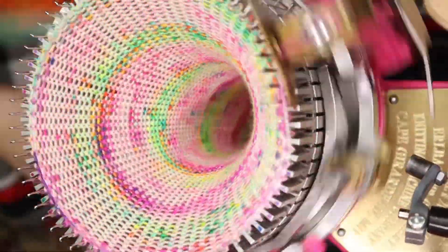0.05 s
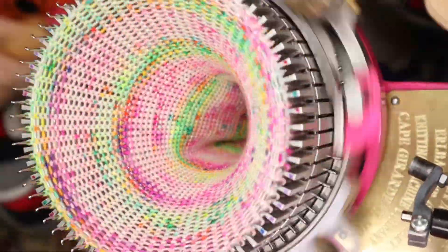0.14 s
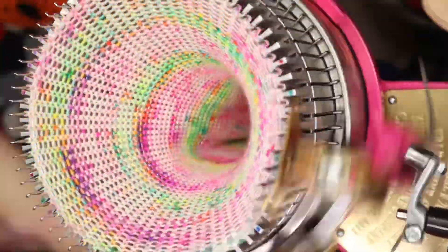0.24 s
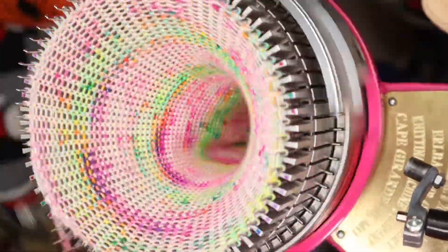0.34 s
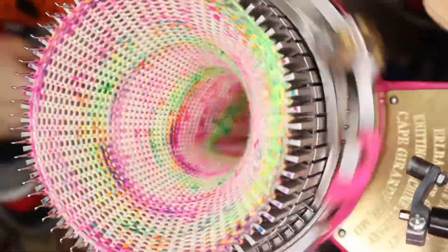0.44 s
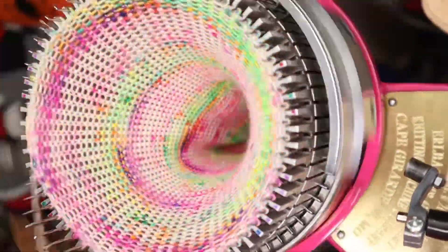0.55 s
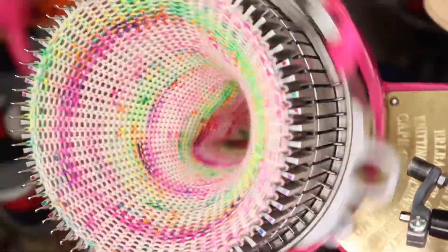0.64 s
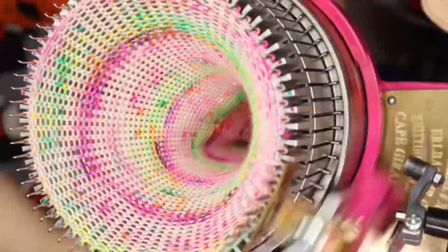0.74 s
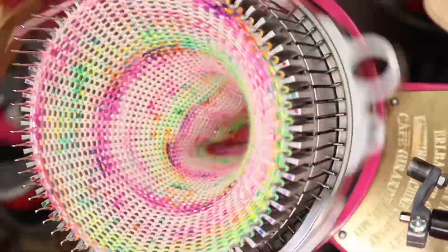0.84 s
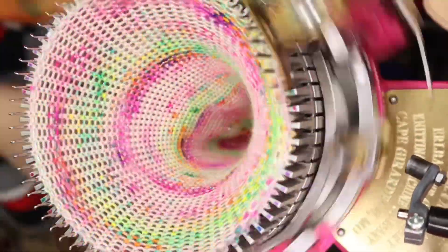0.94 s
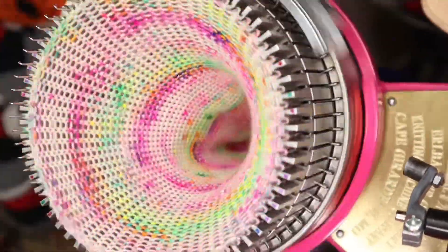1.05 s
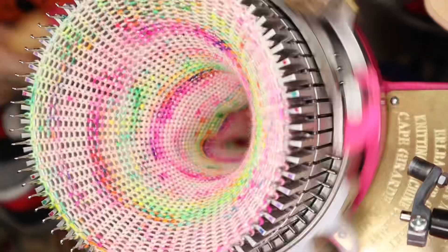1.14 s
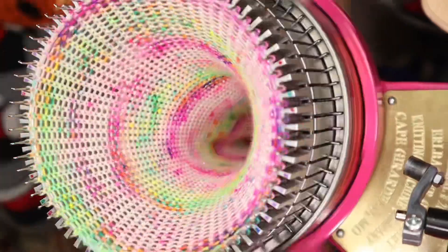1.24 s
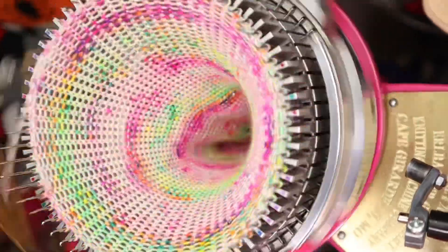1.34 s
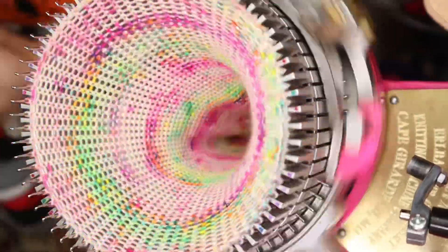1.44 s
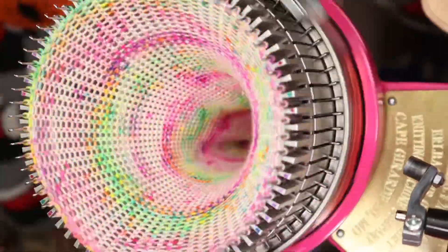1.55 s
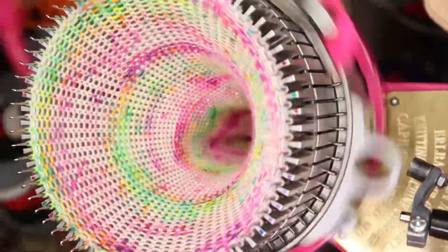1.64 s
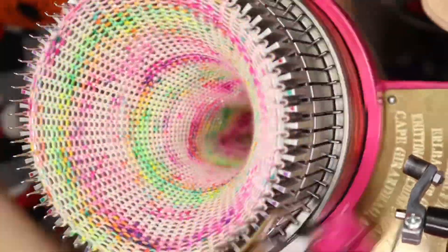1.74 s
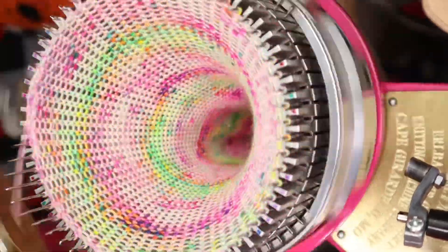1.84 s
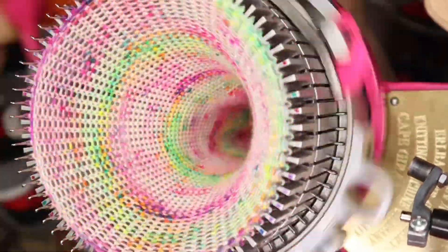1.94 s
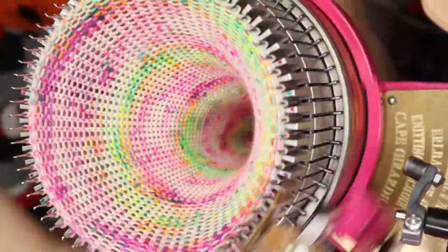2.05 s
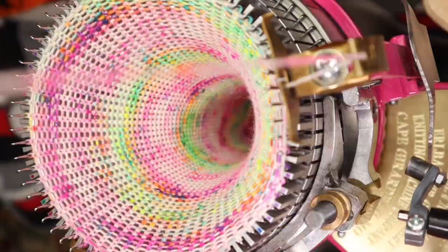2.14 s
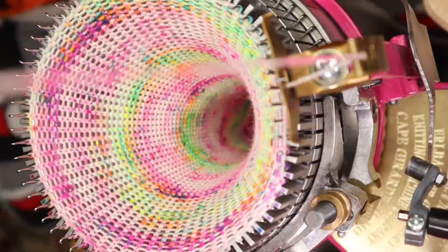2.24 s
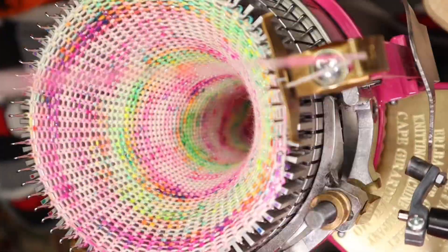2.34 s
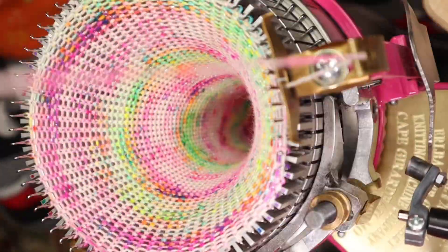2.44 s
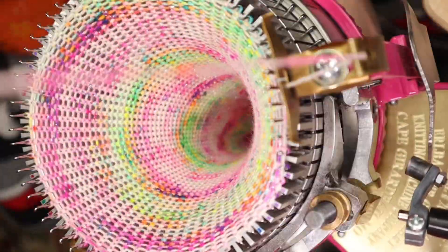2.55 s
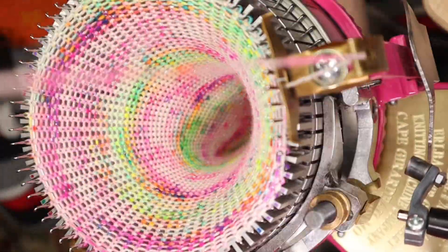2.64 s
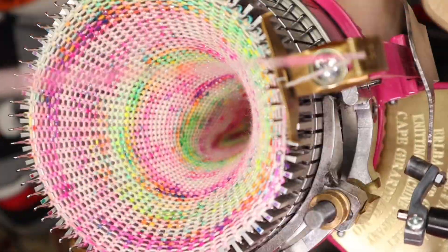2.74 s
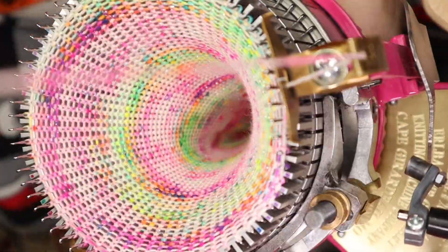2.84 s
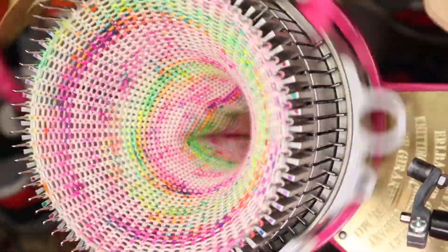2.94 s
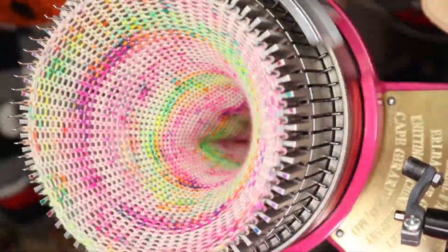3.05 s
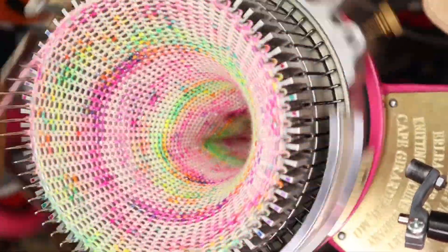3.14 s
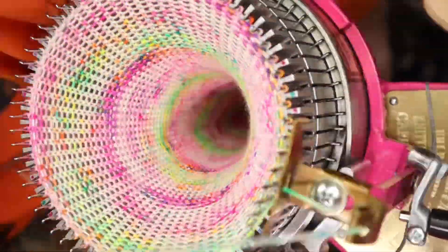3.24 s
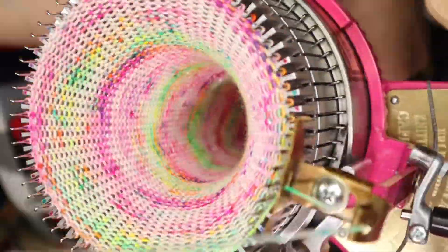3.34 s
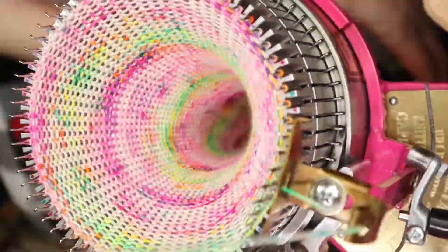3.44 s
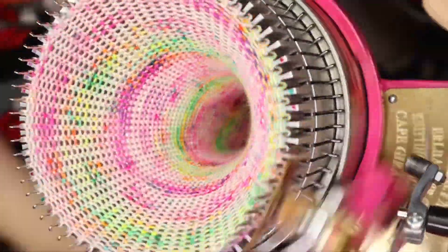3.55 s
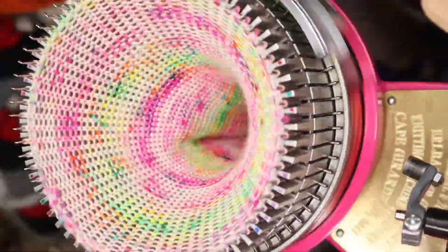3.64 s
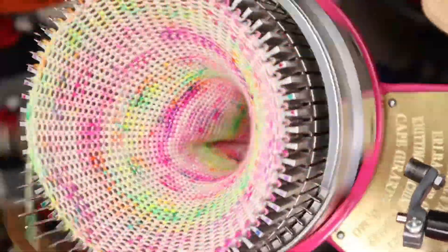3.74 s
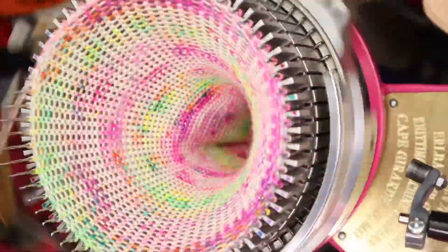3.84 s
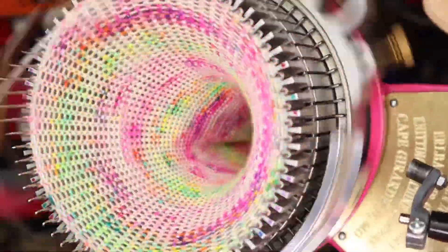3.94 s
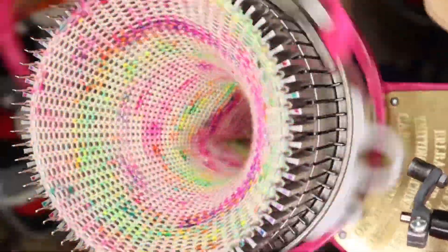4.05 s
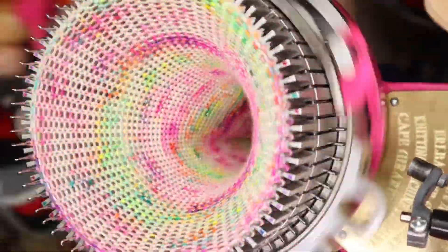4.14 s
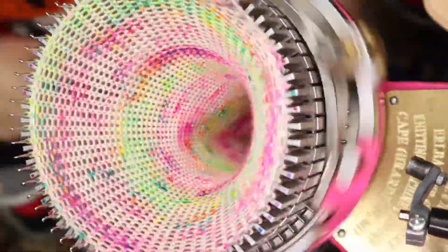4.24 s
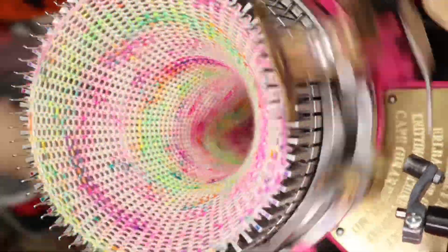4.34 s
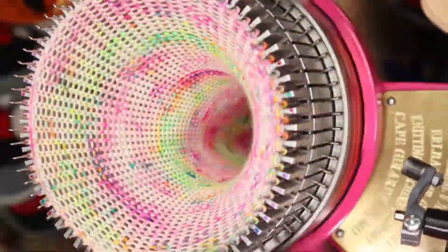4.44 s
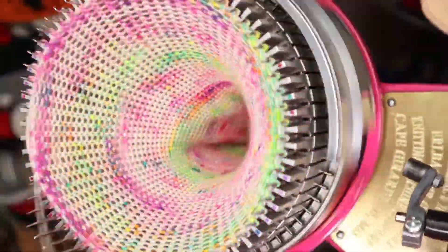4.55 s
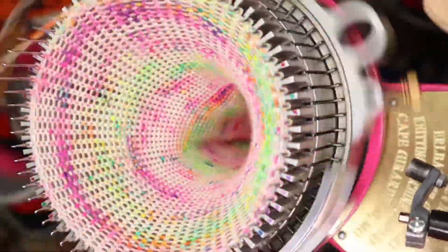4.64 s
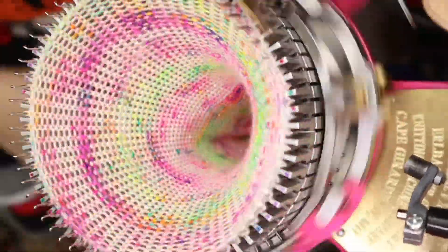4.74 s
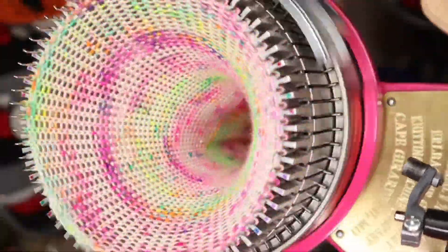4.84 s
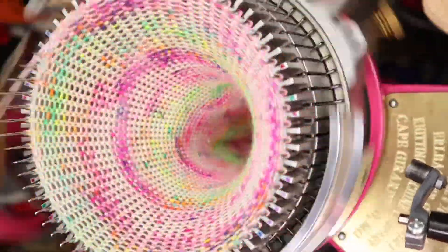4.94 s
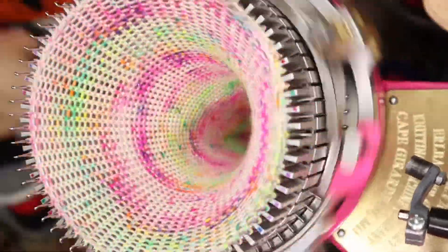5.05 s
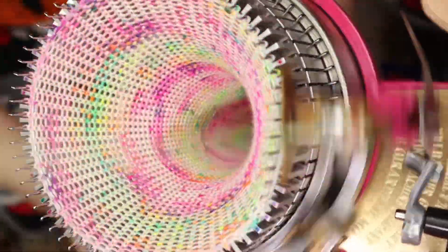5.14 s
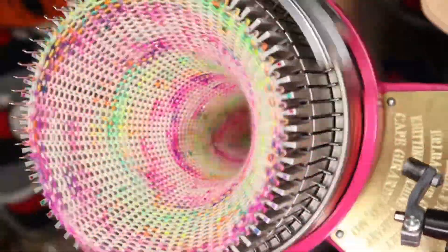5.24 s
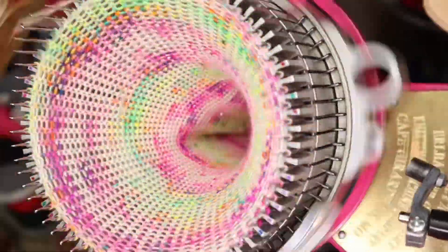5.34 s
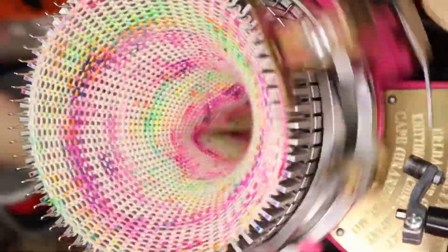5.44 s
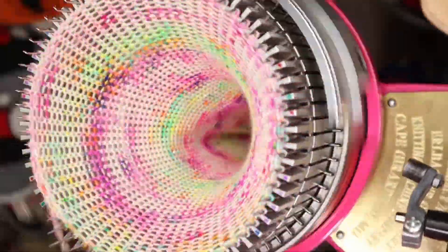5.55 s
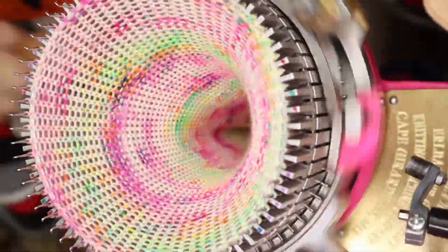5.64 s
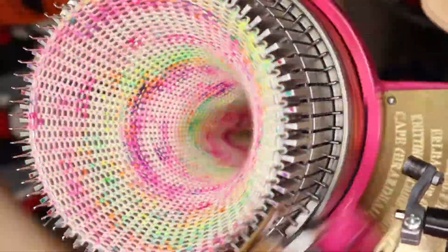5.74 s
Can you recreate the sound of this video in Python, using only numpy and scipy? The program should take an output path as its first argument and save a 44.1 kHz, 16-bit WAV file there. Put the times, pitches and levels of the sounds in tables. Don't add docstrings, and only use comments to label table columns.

```python
import sys
import numpy as np
from scipy import signal
from scipy.fft import rfft, irfft, next_fast_len
from scipy.io import wavfile
from scipy.ndimage import uniform_filter1d

SR = 44100
rng = np.random.default_rng(int(sys.argv[2]) if len(sys.argv) > 2 else 0)


def nominal_scale(level):
    x = np.asarray(level, float) / 20
    return 10 ** x


def store_pcm(level_fs):
    pcm = np.round(np.clip(level_fs, -1, 1) * 32767).astype(np.int16)
    wavfile.write(sys.argv[1], SR, np.atleast_2d(pcm).T)


N = 255151
NEEDLES = 72
EDGE_HZ = 15790

# [t/s, trip level/dB, spring-back level/dB]
TURNS = [(0.0444, -33, -35), (0.178, -22, -26.5), (0.3031, -24, -25.5), (0.4356, -39, -42),
         (0.5753, -35, -34), (0.7232, -27, -35), (0.862, -16.5, -27), (0.9949, -21, -28),
         (1.1341, -23.5, -36), (1.267, -22, -30), (1.4034, -19, -31), (1.5395, -22, -29),
         (1.675, -27, -27.5), (1.8041, -42, -31), (1.934, -20.5, -33), (2.0669, -40, -47),
         (2.1964, -38, -37), (2.3301, -32, -32), (2.4801, -40, -52), (4.0158, -50, -38),
         (4.2142, -25, -31.5), (4.43, -20.5, -28), (4.6048, -24.5, -29), (4.7702, -25, -29.5),
         (4.9412, -24, -33), (5.0999, -24, -26.5), (5.2691, -24, -28), (5.434, -20, -29.5),
         (5.5946, -21, -26.5), (5.7536, -23.5, -27)]


def evened(x):
    return x / np.sqrt(np.mean(x ** 2) + 1e-20)


def peaked(x):
    return x / abs(x).max()


def read(points, hz):
    f, value = np.transpose(points)
    return np.interp(np.log(hz + 1), np.log(f + 1), value)


def add(mix, s, sound):
    part = mix[..., round(s * SR):][..., :sound.shape[-1]]
    part += sound[..., :part.shape[-1]]


def ring(x, modes):
    out = np.zeros(x.shape)
    for k, (hz, width, db) in enumerate(modes):
        r = np.exp(-np.pi * width / SR)
        pole = r * np.exp(2j * np.pi * hz / SR)
        resonance = signal.lfilter([1 - r], [1, -pole], x).real
        out += (-1) ** k * nominal_scale(db) * 2 * resonance
    return out


def coloured(x, points):
    size = next_fast_len(N)
    response = nominal_scale(read(points, np.fft.rfftfreq(size, 1 / SR)))
    return irfft(rfft(x, size) * response, size)[..., :N]


def load(lobes, turns):
    grid = np.arange(256) / 256
    lift_db = 0
    for at, width, db in lobes:
        distance = (grid - at + .5) % 1 - .5
        lift_db = lift_db + db * np.exp(-.5 * (distance / width) ** 2)
    return lift_db[(turns % 1 * 256).astype(int)]


def moving():
    t = np.arange(N) / SR
    stop_s, brake_db_per_s, start_s, pick_up_db_per_s = 2.457, 1298, 4.045, 400
    braking_db = (stop_s - t) * brake_db_per_s
    starting_db = (t - start_s) * pick_up_db_per_s
    return np.clip(np.maximum(braking_db, starting_db), -70, 0)


def angle():
    pull, fastest_turn = .17, .34
    s = np.array([row[0] for row in TURNS])
    s = np.concatenate([[2 * s[0] - s[1]], s, [2 * s[-1] - s[-2]]])
    turns = np.interp(np.arange(N) / SR, s, np.arange(len(s)))
    swing = 1 + np.sin(2 * np.pi * (turns - fastest_turn))
    return turns, turns + pull / (2 * np.pi) * swing


def strikes(turns, offset, decay_s, uneven_db, late):
    needle = np.floor(NEEDLES * turns + offset).astype(int)
    size, lag = rng.standard_normal((needle.max() + 1, 2)).T
    at = np.flatnonzero(np.diff(needle) > 0)
    struck = needle[at]
    hits = np.zeros(N)
    hits[np.clip(at + (late * SR * lag[struck]).astype(int), 0, N - 1)] = nominal_scale(uneven_db * size[struck])
    rattle = signal.lfilter([1], [1, -np.exp(-1 / (decay_s * SR))], hits)
    return evened(hits), evened(rattle)


def machine():
    # [t/s, level/dB]
    crank = [(0, 1), (.8, 0.5), (1.6, 0.35), (2, 1.5), (2.45, 0.5), (4.03, -5.5), (4.1, -3.5), (4.2, -1.5),
             (4.3, -4), (4.45, -2.5), (4.7, -1.5), (5.1, -1), (5.8, -1)]
    # [f/Hz, bandwidth/Hz, level/dB, lateness of its loud side/turns]
    frame = [(326, 21, -34, 0.31), (507, 20.7, -13.5, 0.026), (620, 44, -26, -0.23),
             (786, 80, -25.5, -0.085), (1150, 62, -14.5, -0.014), (1348, 45, -17, 0.12)]
    cylinder = [(2090, 170, -14, .03), (2280, 147, -6, 0.035), (2490, 120, -8, 0.022),
                (2633, 173, -6, -0.035), (2996, 270, -8.5, -0.017), (3294, 330, -16, -.4)]
    needle = [(5040, 330, -1, -0.0094), (5260, 480, -3, 0.0063)]
    hook = [(3740, 1090, -13.5, -0.078), (4423, 950, -9, -0.084), (5723, 260, -3.5, -0.0031),
            (6243, 270, -4.5, 0.0085), (6700, 590, -9.5, .015)]
    latch = [(7640, 270, -13, -0.0076), (9440, 390, -12.5, -0.03), (10370, 610, -7, -0.0095),
             (11370, 660, -9, .03), (12600, 250, -8.5, .06)]
    yarn_guide = [(8050, 2200, -19.5, 0.048), (13100, 620, -30, 0.02), (14950, 960, -14.5, 0.024)]
    # [position/turns, width/turns, lift level/dB]
    frame_load = [(0.45, .2, 10), (0.04, 0.069, 8.5)]
    cylinder_load = [(0.498, 0.08, 9.55), (.65, 0.054, 11.2), (0.841, 0.069, 14)]
    needle_load = [(0.66, 0.18, 3.8), (0.829, 0.057, 13.4), (.02, 0.033, 9.4)]
    hook_load = [(0.39, 0.12, 7.7), (0.885, 0.13, 10.1), (0.015, 0.041, 4.7)]
    latch_load = [(0.41, 0.071, 3.9), (0.844, 0.081, 11.8), (0.032, 0.052, 9.8)]
    guide_load = [(0.46, 0.12, 3.8), (0.95, 0.039, 1.56), (0.013, 0.019, 5.7)]
    # modes, loads, unloaded dB, share of effort followed, friction, share of like knocks, bunching dB
    parts = [(frame, frame_load, -12, .3, 1.5, .3, 2.2),
             (cylinder, cylinder_load, -12, 1.1, .4, 2.2, 1.3),
             (needle, needle_load, -11, 1.1, .55, .7, 1.9),
             (hook, hook_load, -9.5, 1.1, .55, .7, 1.6),
             (latch, latch_load, -9, .9, .6, 0, 1.8),
             (yarn_guide, guide_load, -2.5, .7, .9, 0, 1.2)]
    full_db, clump_s = -30.5, .018
    t = np.arange(N) / SR
    turns, carriage = angle()
    effort_db = np.interp(t, *np.transpose(crank))
    moving_db = moving()
    out = np.zeros((2, N))
    for k, (modes, lobes, rest_db, follow, slide, alike, bunch_db) in enumerate(parts):
        knocks, rattle = strikes(carriage, offset=k / 6, decay_s=.0006, uneven_db=3.0, late=.00003)
        for hz, width, db, late in modes:
            clump_db = bunch_db * np.interp(t / clump_s, np.arange(1000), rng.standard_normal(1000))
            round_db = rest_db + load(lobes, turns - late) + clump_db
            paths = 1 + (hz > 6000)
            friction = slide * nominal_scale(-.5 * round_db)
            noise = (rattle + friction) * rng.standard_normal((paths, N), np.float32)
            level = nominal_scale(full_db + follow * effort_db + moving_db + round_db)
            rung = ring(level * (noise + alike * knocks), [(hz, width, db)])
            if 1900 < hz < 7000:
                rung = ring(rung, [(hz, width, 0)])
            out[:paths] += rung
    return out


def counter():
    # [f/Hz, bandwidth/Hz, level/dB]
    counter_modes = [(3640, 1760, -16), (5100, 300, 2), (6170, 890, -6), (11060, 1760, -11),
                     (13950, 1420, -7)]
    out, t = np.zeros(N), np.arange(1500) / SR
    gaps = np.minimum(np.diff([row[0] for row in TURNS], prepend=-.09), .175)
    for (s, trip_db, back_db), gap in zip(TURNS, gaps):
        a, b, c = rng.standard_normal((3, len(t)))
        lever = peaked(ring(nominal_scale(-60 * t / 0.027) * a * np.minimum(t / 0.0026, 1), counter_modes))
        snap = peaked(ring(nominal_scale(-60 * t / 0.0066) * b, [(14600, 2300, 0)]))
        spring = peaked(ring(nominal_scale(-60 * t / 0.043) * c * np.minimum(t / 0.0031, 1), counter_modes))
        add(out, s, nominal_scale(trip_db - 6.5) * (lever + .5 * snap))
        add(out, s + 0.11 * gap - .01, nominal_scale(back_db) * spring)
    return out


def gear():
    # [multiple, level/dB]
    harmonics = [(1, -62.5), (2, -63)]
    # [position/turns, width/turns, lift level/dB]
    gear_load = [(.42, 0.2, 12.7)]
    # [f/Hz, bandwidth/Hz, level/dB]
    gear_box = [(528, 70, 0.5), (635, 87, 1), (1146, 150, -1.5)]
    turns, carriage = angle()
    uneven_db = 4 * np.interp(2 * turns, np.arange(80), rng.standard_normal(80))
    slack = 0.82 * evened(uniform_filter1d(rng.standard_normal(N), size=900))
    phase = 2 * np.pi * NEEDLES * carriage + slack
    tone = sum(nominal_scale(db) * np.sin(k * phase) for k, db in harmonics)
    housed = ring(ring(tone, gear_box), gear_box)
    return housed * nominal_scale(load(gear_load, turns) - 12 + uneven_db + moving())


def glides(rows):
    out = np.zeros(N)
    for s, length, from_hz, glide, db in rows:
        hz = from_hz * np.geomspace(1, glide, round(length * SR))
        tremble = evened(uniform_filter1d(rng.standard_normal(SR // 4), 400))[:len(hz)]
        hz = hz * (1 + 0.019 * tremble)
        tone = np.sin(2 * np.pi * np.cumsum(hz) / SR)
        add(out, s, nominal_scale(db) * tone * np.hanning(len(hz)) ** 0.2)
    return out


def whines():
    # [t/s, duration/s, f/Hz, level/dB]
    held = [
        (.2, 0.054, 502, -79),
        (.75, 0.083, 498, -61.5),
        (1.2, .16, 1150, -59),
        (4.64, .1, 497, -56.5),
        (4.76, .044, 1157, -67),
        (4.96, 0.116, 494, -60),
        (5.41, 0.13, 499, -61),
        (5.62, .11, 499.7, -56.5),
    ]
    return glides([(s, length, hz, 1, db) for s, length, hz, db in held])


def squeaks():
    # [t/s, initial f/Hz, glide ratio, level/dB]
    pulls = [(.19, 600, 1.04, -60), (1.69, 600, 1.06, -65), (1.83, 620, 1.07, -59), (2.09, 620, 1.05, -66),
             (4.02, 476, 1.2, -59), (4.1, 874, 1, -63), (4.45, 730, 1.03, -60.5), (4.79, 720, 1.14, -58.5),
             (5.12, 735, 1.05, -61), (5.29, 745, 1.2, -60), (5.34, 667, 0.86, -53)]
    return glides([(s, 0.053, *rest) for s, *rest in pulls])


def scrapes():
    # [t/s, duration/s, level/dB]
    drags = [
        (2.887, 0.033, -47.5),
        (3.649, 0.0265, -38),
    ]
    out = np.zeros(N)
    for s, length, db in drags:
        n = round(length * SR)
        swell = np.linspace(.4, 1, n) * signal.windows.tukey(n, .3)
        grain = evened(uniform_filter1d(rng.standard_normal(SR // 10), size=40))
        grit = rng.standard_normal(SR // 10) * nominal_scale(4.1 * grain)
        add(out, s, nominal_scale(db) * swell * grit[:n])
    return ring(out, [(3660, 780, -1.5), (5200, 900, 0.55), (6500, 700, -1)])


def taps():
    # [t/s, peak level/dB, f/Hz, bright tick level/dB, left-right level/dB]
    clinks = [(2.474, -35, 5240, -13, -4), (2.4806, -27, 10900, -8.5, -8), (2.482, -33, 7500, -2, -6),
               (2.809, -45, 5800, -21, 8), (2.861, -37.5, 4800, -15, 0), (2.902, -43, 5100, -21, -2.5),
              (2.913, -45, 6700, -23, -1), (2.9718, -34, 3800, 6, -4), (2.972, -22, 5840, -13, -7),
              (2.981, -32, 3650, -2.5, -3), (3.596, -37, 4860, -3.5, .4), (3.655, -40, 4320, -19, -6),
              (3.661, -38, 5100, -4, 6), (3.665, -38, 6700, -25, -12), (3.6683, -31, 5100, -18, -5),
              (4.0045, -44, 9050, 0, -4.5), (4.017, -31.5, 13800, -3, -7), (4.0217, -29.5, 5400, -16, -2),
              (4.028, -36, 5960, 0, 4), (4.033, -43, 4300, -5, 0), (4.0352, -29.5, 6300, -6, 0)]
    # [t/s, peak level/dB, f/Hz, bright tick level/dB]
    dull_taps = [(2.509, -44.5, 1160, -20), (2.519, -48, 1200, -20), (2.638, -54, 1150, -12),
                 (2.675, -60, 1230, -25), (2.775, -52, 1990, -19), (2.9715, -45.5, 670, -34),
                 (2.973, -43.5, 1300, -30), (2.982, -44, 1150, -35), (3.028, -32, 1390, -32),
                 (3.0598, -50, 1120, -18), (3.064, -45, 1780, -12), (3.184, -56, 1790, -17),
                 (3.226, -54, 1790, -16), (3.493, -54, 1760, 4), (3.975, -50, 2960, -11)]
    # [t/s, peak level/dB, f/Hz]
    ticks = [
        (2.733, -49, 9300),
        (3.0268, -41, 2900),
        (3.0508, -50, 2700),
        (3.0597, -36, 2680),
        (3.699, -50, 9300),
        (3.794, -44, 9900),
        (3.86, -45, 9800),
    ]
    clink_t60_s, tick_t60_s, tap_cycles = .017, .007, 45
    rows = [(*row, clink_t60_s) for row in clinks]
    rows += [(*row, 0, tap_cycles / row[2]) for row in dull_taps]
    rows += [(s, db, hz, -7, 1.5, tick_t60_s) for s, db, hz in ticks]
    out, t = np.zeros((2, N)), np.arange(3000) / SR
    for s, peak_db, hz, tick_db, pan_db, t60 in rows:
        a, b = rng.standard_normal((2, len(t)))
        fall = nominal_scale(-60 * t / t60)
        modes = [(hz, 3.44 / t60, 0), (1.55 * hz, 0.2 * hz, -14),
                 (2.22 * hz, 0.32 * hz, -17), (0.747 * hz, 0.14 * hz, -16)]
        body = peaked(ring((a + 5.8) * fall ** 6.1, modes))
        crack = peaked(ring(b * fall ** 0.66, [(3650, 1200, 3), (6400, 2900, -1),
                                               (9200, 1600, 2.5), (13100, 3500, -1.0)]))
        sides = nominal_scale(peak_db + np.array([[.5], [-.5]]) * pan_db)
        add(out, s, sides * (body + nominal_scale(tick_db) * crack))
    return out


def ports(shared, apart):
    # [f/Hz, left-right correlation]
    same = [(1000, 1), (4000, 1), (7000, 0.96), (10000, 1), (12500, 0.19), (16000, 0.17)]
    # [f/Hz, left-right level/dB]
    lean_db = [(300, 1.5), (700, 0.9), (2600, -1.3), (4400, -3), (8100, -3.5), (15000, -3)]
    size = next_fast_len(N)
    hz = np.fft.rfftfreq(size, 1 / SR)
    spread = np.arccos(np.clip(read(same, hz), 0, 1)) / 2
    lean = nominal_scale(np.array([[.5], [-.5]]) * read(lean_db, hz))
    middle = np.cos(spread) * rfft(shared, size)
    side = np.array([[1], [-1]]) * np.sin(spread) * rfft(apart, size)
    return irfft(lean * (middle + side), size)[:, :N]


def rustle():
    # [t/s, duration/s, level/dB]
    strokes = [(2.454, 0.13, -55), (2.52, 0.39, -64.5), (2.843, .06, -53.5), (2.902, 0.037, -64),
               (3.021, .1, -56.5), (2.98, 0.29, -67), (3.212, 0.14, -59), (3.43, 0.13, -66),
               (3.565, 0.16, -56), (3.702, 0.13, -64), (3.81, 0.099, -66), (3.917, 0.19, -55.5)]
    # [f/Hz, level/dB]
    colour = [(800, -25), (2000, 4.5), (3600, 2.5), (8000, -2.5), (11500, -1), (14000, -2), (16500, 5.5)]
    level = np.full(N, nominal_scale(-61.5))
    for s, length, db in strokes:
        add(level, s, nominal_scale(db) * signal.windows.tukey(round(length * SR), 0.75))
    crackle = nominal_scale(2.0 * evened(uniform_filter1d(rng.standard_normal(N), 90)))
    fibres = rng.standard_normal((2, N)) * crackle
    fibres += 0.13 * rng.standard_normal(N)
    return evened(coloured(fibres, colour)) * level


def room(x):
    t = np.arange(6000) / SR
    tail = rng.standard_normal((2, len(t))) * nominal_scale(-60 * t / .12) * (t > .003)
    return signal.fftconvolve(x, tail / np.linalg.norm(tail[0]), axes=1)[:, :N]


def room_tone():
    # [f/Hz, level/dB]
    air = [(20, 12), (60, -11.5), (200, -7), (460, -2.5), (1300, -3), (2500, -12), (5000, -12),
           (10000, -15), (13000, -49), (16000, -44)]
    shared, left, right = rng.standard_normal((3, N))
    return nominal_scale(-64) * evened(coloured(shared + 0.19 * np.array([left, right]), air))


def hum():
    # [f/Hz, level/dB]
    tones = [(1200, -74), (910, -83), (1790, -96)]
    t = np.arange(N) / SR
    waver = nominal_scale(2.2 * evened(uniform_filter1d(rng.standard_normal(N), 2500)))
    phase = np.array([[.4], [-.4]])
    return waver * sum(nominal_scale(db) * np.sqrt(2) * np.sin(2 * np.pi * hz * t + phase) for hz, db in tones)


def starved(x):
    hz, t, z = signal.stft(x, SR, nperseg=1024)
    treble = (hz > 6000) & (hz < EDGE_HZ)
    power = uniform_filter1d((abs(z) ** 2).sum(0), size=9, axis=0)
    mute = (power < np.percentile(power[treble], 4.0)) & treble[:, None]
    return signal.istft(z * np.where(mute, .03, 1), SR, nperseg=1024)[1][:, :N]


def scene():
    shared, apart = machine()
    shared = shared + counter() + gear() + whines() + squeaks() + scrapes()
    near = ports(shared, apart) + taps()
    near = signal.sosfilt(signal.butter(3, 300, "high", fs=SR, output="sos"), near)
    return near + nominal_scale(-43.5) * room(near) + rustle() + room_tone() + hum()


def roll_off(x):
    return signal.sosfilt(signal.butter(12, 17030, fs=SR, output="sos"), x)


def record(dry):
    thin = signal.sosfilt(signal.butter(1, 150, "high", fs=SR, output="sos"), dry)
    band_limit = signal.firwin(1023, EDGE_HZ, window=("kaiser", 6), fs=SR)
    thin = signal.oaconvolve(thin, band_limit[None], "same")
    mix = starved(thin)
    return roll_off(mix)


dry = scene()
out = record(dry)
store_pcm(out)
```